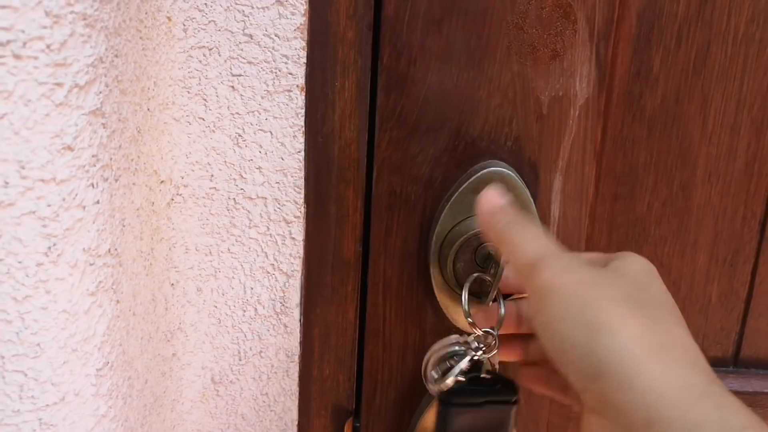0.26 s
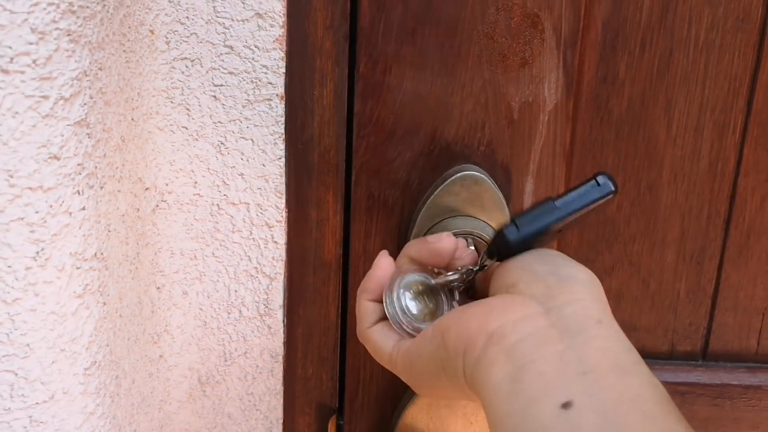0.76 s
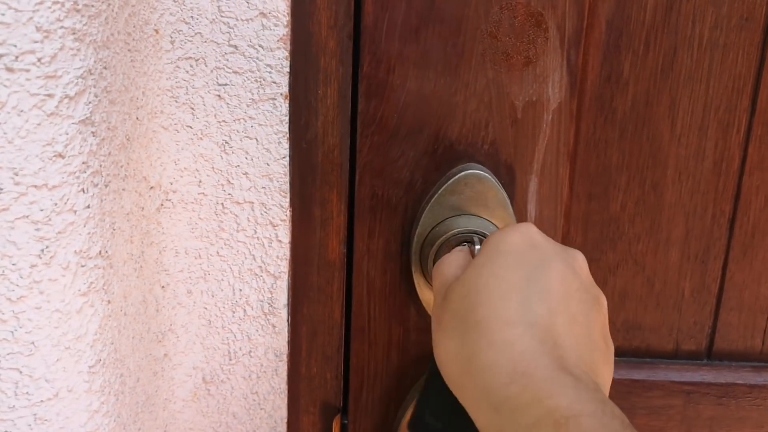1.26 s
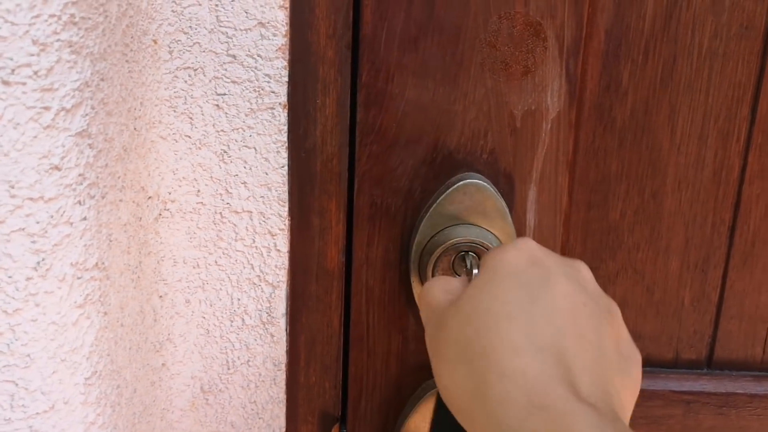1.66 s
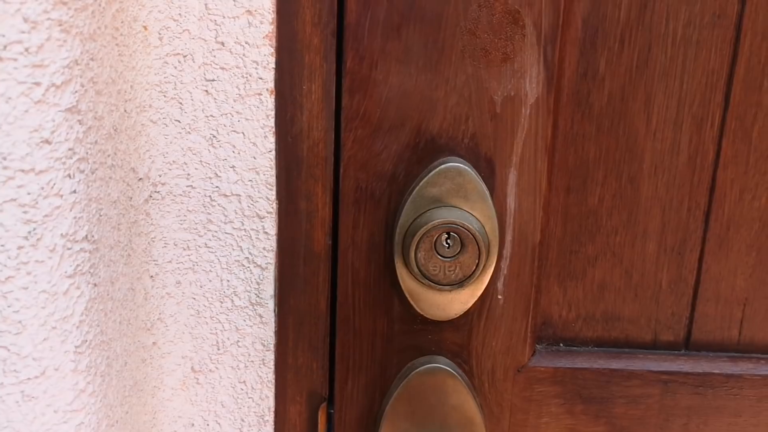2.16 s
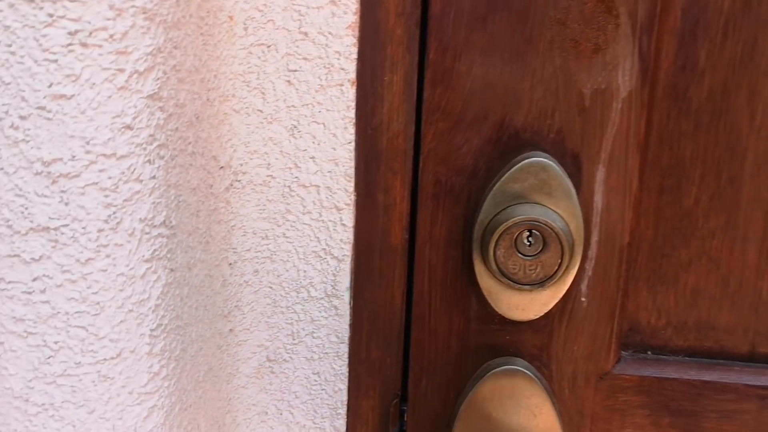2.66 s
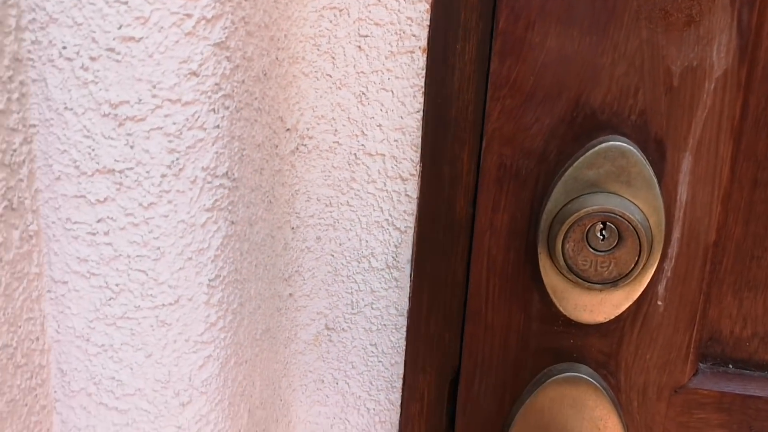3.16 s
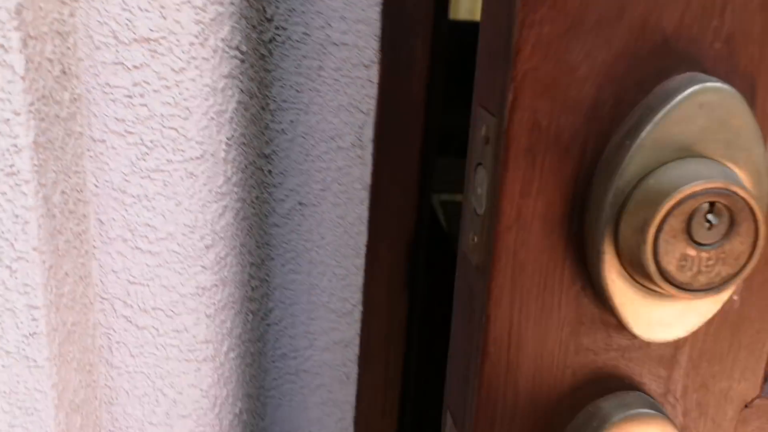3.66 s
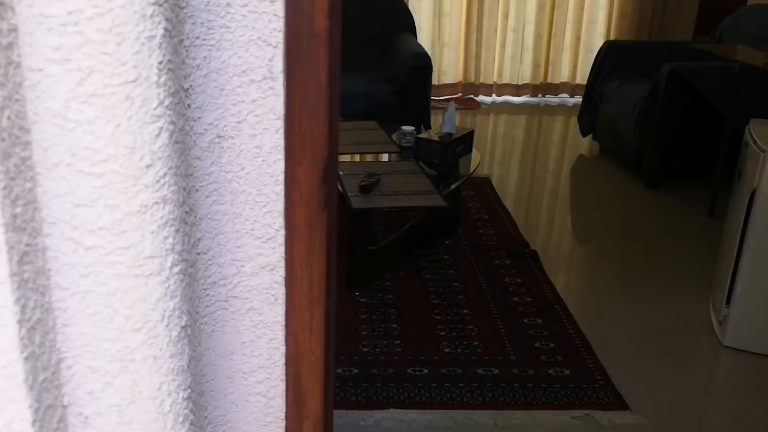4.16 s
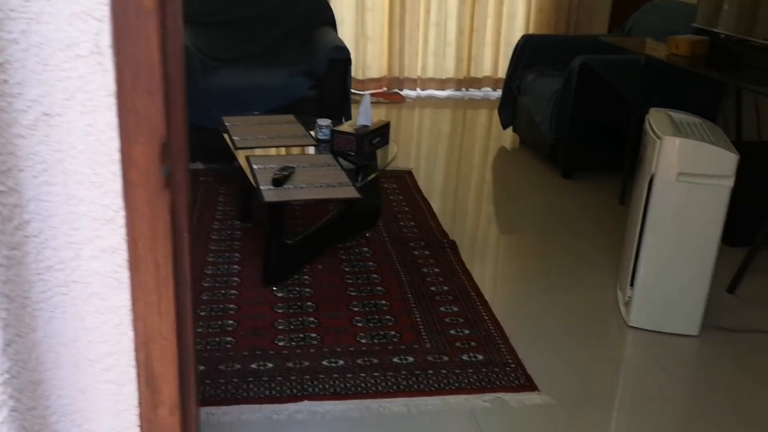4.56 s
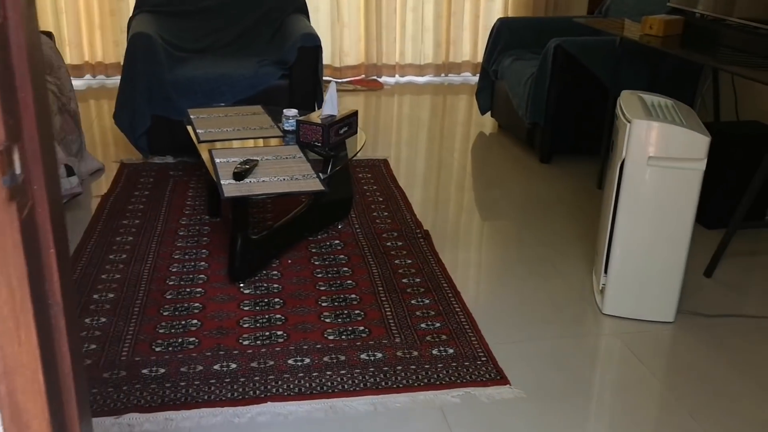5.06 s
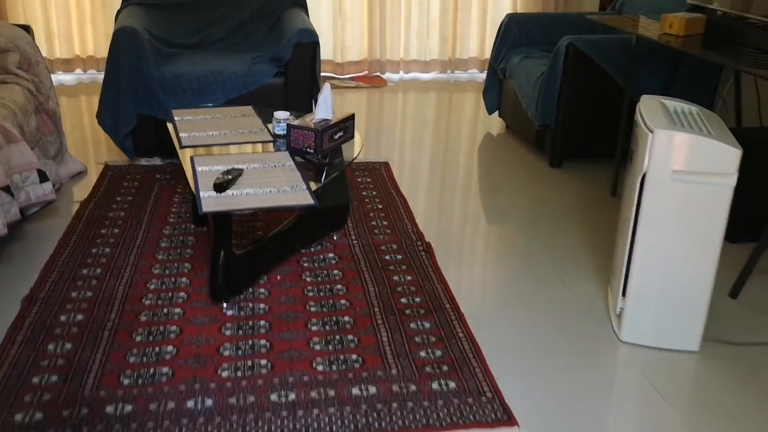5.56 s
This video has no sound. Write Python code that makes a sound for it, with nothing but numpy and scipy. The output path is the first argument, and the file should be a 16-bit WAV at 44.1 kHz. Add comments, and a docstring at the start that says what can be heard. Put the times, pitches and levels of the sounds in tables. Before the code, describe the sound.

Close, dry stereo sound of unlocking a door: clustered metallic ticks and rattling keys in the first second, a lull, then key withdrawal and light jingling. Near three seconds come the sharpest handle clacks with woody thumps, followed by a click as the door releases. A faint hinge rub and floor brush follow, under deep handling rumble and wind-like buffeting, fading to faint air with no voices.

```python
"""Outdoors at a door, a key enters the lock, turns and is pulled out; keys jangle, the handle clacks, the door swings in.
Each contact is a decaying burst of noise that excites damped modes of lock, plate, keys and wood.
Between contacts, ticks and noise make the scrape and rattle; the leaf knocks and the hinge rubs.
Shaped noise gives the hiss of air, the brush on the floor, and the rumble of hand and gusts.
The two ports of the hand-held microphone colour the sound differently."""
import sys
import numpy as np
from scipy import signal
from scipy.fft import rfft, irfft, next_fast_len
from scipy.io import wavfile
from scipy.ndimage import uniform_filter1d

SR = 44100
rng = np.random.default_rng(int(sys.argv[2]) if len(sys.argv) > 2 else 0)


def dump_mix(stems):
    """Bounce the given channels to the path in sys.argv[1] as a 16-bit WAV at rate SR."""
    frames = np.atleast_2d(stems).T  # one column per channel
    limited = np.clip(frames, -1, 1)  # hard clip at full scale
    pcm = np.round(limited * 32767).astype(np.int16)
    wavfile.write(sys.argv[1], SR, pcm)


N = 256926   # samples in the scene
SHAKE = 8192   # samples that one contact may last
LONGEST_RING = 60   # cycles, beyond a short allowance: hand and door damp every part
PORT_LAG = 30   # samples by which the right port hears the contacts later
CUTOFF_HZ = 16300

# Hand at rest: (time [s], level [dB])
HAND_AT_REST = [(0, -49), (1.5, -50), (2.5, -51.5), (3.85, -50.5), (4.08, -55.5), (4.38, -53.5), (5.2, -55),
                (5.83, -53.5)]
STILL_UPPER_DB = -10   # upper bass, re the hand at rest
# Hand jolts: (start [s], hold [s], level [dB], upper bass re level [dB])
HAND_JOLTS = [(0.117, 0.041, -46.5, -4), (0.284, 0.13, -36.5, -19), (0.419, 0.13, -30.5, -21.5),
              (0.556, 0.14, -44.5, -3), (0.806, 0.083, -39.5, -22.5), (0.973, 0.04, -42, -41),
              (1.046, 0.22, -41, -13.5), (1.336, 0.028, -39, -31), (1.631, 0.11, -36, -8.5),
              (1.734, 0.083, -30.5, -23), (1.848, 0.1, -39, -30), (2.04, 0.068, -40, -31),
              (2.217, 0.27, -48.5, -54), (2.614, 0.19, -46.5, -5.5), (2.866, 0.17, -39, -4.5),
              (3.092, 0.039, -39.5, -14), (3.28, 0.041, -45, -28), (3.7, 0.065, -59, -33),
              (3.416, 0.18, -62, 1.5), (3.895, 0.069, -47.5, -6.5), (3.997, 0.023, -74, -16),
              (4.413, 0.072, -39.5, -33), (4.474, 0.225, -31.5, -27), (4.714, 0.1, -29.5, -32),
              (4.941, 0.21, -33, -31), (5.245, 0.045, -42.5, -31), (5.343, 0.035, -39, -40),
              (5.548, .08, -46, -35), (5.723, 0.12, -56, -23)]
JOLT_ATTACK_S, JOLT_T60_S = 0.026, 0.22
# Gusts at the ports: (start [s], hold [s], level [dB])
PORT_GUSTS = [(.28, 0.094, -48.5), (1.65, 0.11, -51.5), (2.9, 0.03, -56), (3.11, .04, -47),
              (4.45, 0.17, -34.5), (4.62, 0.2, -40.5), (4.77, 0.08, -34.5), (4.96, 0.11, -40)]
GUST_ATTACK_S, GUST_T60_S = 0.065, 0.27
CALM_DB = -16.5   # draught between gusts, re the hand at rest
# Spectrum of the deep hand rumble: (frequency [Hz], relative density [dB per Hz])
DEEP_SPECTRUM = [(8.8, -25), (15, 10), (32, -2), (46, 7.5), (120, -25.5), (160, -40), (260, -120)]
# Spectrum of the upper bass of the hand: (frequency [Hz], relative density [dB per Hz])
UPPER_SPECTRUM = [(47, -52.5), (80, 7), (113, 0), (188, -1.5), (221, -11), (340, -19.5), (400, -20.5),
                  (520, -25), (880, -120)]
# Spectrum of the gusts: (frequency [Hz], relative density [dB per Hz])
GUST_SPECTRUM = [(15, -31), (40, -4.5), (75, -0.5), (120, -8.5), (180, -19.5), (280, -63), (450, -75)]

# Outdoor air: (time [s], level below the treble [dB], treble gain [dB])
AIR_LEVELS = [(0, -67.5, 9), (.4, -62.5, -3), (1.45, -72, 2), (2.3, -72, 4), (3.2, -55, 9.5),
              (3.7, -60, 11), (3.97, -59, 10), (4.1, -63, 5.5), (4.4, -64, 7), (4.95, -64.5, 8),
              (5.08, -60.5, 5), (5.5, -66.5, 7.5), (5.83, -60, 9)]
# Spectrum of air and floor brush ahead of the treble gain: (frequency [Hz], relative density [dB per Hz])
AIR_SPECTRUM = [(150, -15), (260, 2), (400, -13), (700, -7), (1300, -3.5), (2050, 4), (2700, -1.5),
                (3600, -12.5), (4700, -14.5), (5500, -11), (6500, -16), (8000, -10.5), (9800, -16),
                (12000, -27), (15000, -29.5), (16200, -69)]
# The door edge brushes the floor
BRUSH_S, BRUSH_HOLD_S, BRUSH_DB, BRUSH_ATTACK_S, BRUSH_T60_S = 4.404, 0.42, -54.5, 0.15, 0.37

# Hinge rubbing faintly as the door swings: (start [s], hold [s], level [dB])
HINGE_RUBS = [(3.9, 0.058, -61), (4.01, 0.047, -56.5), (4.14, 0.047, -57.5)]
HINGE_HZ, HINGE_T60_S = 5500, 0.006
HINGE_ATTACK_S, HINGE_FADE_S = 0.052, 0.12

# Scraping and rattling of the working hand:
# (start [s], hold [s], level below the treble [dB], treble gain [dB], left re right [dB])
RATTLE_STROKES = [(0.128, 0.053, -42.5, -14, -7), (0.298, 0.089, -54, -1.5, -1),
                  (0.387, 0.089, -52.5, 6, 2), (0.49, 0.14, -48, 1, -1.5), (0.641, 0.077, -51, 0.5, -4),
                  (0.725, 0.023, -57, -4, -4), (0.809, 0.1, -53, -7.5, -2), (0.936, .03, -58.5, -14, 4),
                  (1.062, 0.11, -44.5, 1, 0), (1.582, 0.15, -63, 1.5, 0), (1.647, 0.049, -48, 2.5, 1),
                  (1.716, 0.088, -52.5, -0.5, -2), (1.872, 0.12, -66.5, 6.5, -7),
                  (1.988, .12, -59.5, 13.5, -1), (2.286, 0.091, -62, -7, 2), (2.373, 0.09, -63, 3.5, 1),
                  (2.628, 0.26, -53, 3.5, -0.5), (2.877, 0.29, -50, 3.5, -0.5), (3.387, 0.081, -47, -18, 3),
                  (3.482, 0.072, -42.5, -4.5, -1)]
RATTLE_ATTACK_S, RATTLE_T60_S = 0.022, 0.096
# Spectrum of the scrape ahead of the treble gain: (frequency [Hz], relative density [dB per Hz])
SCRAPE_SPECTRUM = [(180, -50), (300, -31), (412, 1), (494, -9), (900, -6), (1250, -5), (2000, 3),
                   (3080, -7.5), (6000, -9.5), (6850, -8), (7820, -4.5), (14500, -21), (16000, -27)]

# Dull knocks of the door leaf: (time [s], peak [dB], loudest ring [Hz], decay T60 of the force [s])
LEAF_KNOCKS = [(1.652, -55, 248, 0.28), (2.438, -46, 415, 0.076), (2.731, -40.5, 413, 0.12),
               (2.832, -40.5, 200, 0.1), (2.957, -41.5, 200, 0.094), (3.91, -42.5, 326, 0.057),
               (3.941, -46.5, 371, 0.073), (3.991, -51, 202, 0.05), (4.133, -56.5, 400, 0.049),
               (4.857, -54, 320, 0.093)]
# Metal contacts: (time [s], lock peak [dB], loudest ring [Hz], plate re lock [dB], wood re lock [dB],
# decay T60 of the force [s], extra force of the crack [ratio], left re right [dB])
LOCK_HITS = [(0.1458, -38, 2816, -2.5, -12.5, 0.13, 2.3, 4.5),
             (0.318, -43.5, 1730, -10, -32, 0.096, 5.8, 7), (0.4032, -39, 1770, -27, -10.5, 0.36, 5.1, -2),
             (0.4474, -49, 1980, -22, -2.5, 0.17, 3.0, 12), (0.5293, -44, 1980, -19, -16, 0.18, 3.0, 2),
             (0.544, -35.5, 2040, -10, -5.5, 0.27, 3.5, 3.5),
             (0.5736, -26, 2350, -7, -12, 0.082, 2.8, -1.5), (0.598, -42, 2070, -20, -11, 0.1, 3.0, 7),
             (0.617, -36.5, 2430, -13, -18, 0.1, 3.5, 8), (0.6624, -34, 2270, -12, -20, 0.12, 2.4, 6),
             (0.6886, -38.5, 2620, -20, -15, 0.1, 4.7, 2), (0.7283, -42.5, 1790, -13, -14, 0.075, 4, 8),
             (0.752, -40, 1980, -15, -22, 0.04, 3.0, 4), (0.7887, -52, 2250, -13, -21, 0.17, 3.4, 10),
             (0.823, -46, 2060, -27, -27, 0.2, 3.0, 6), (0.8607, -37.5, 2150, -24, -17, 0.14, 3.8, 10),
             (0.9348, -39.5, 2100, -17, -17, 0.051, 4.6, 12), (1.024, -52, 2150, -6, -44, 0.15, 3.7, -2),
             (1.04, -29.5, 2000, -18, -47, 0.18, 2.5, 4.5), (1.0585, -32, 1950, -11, -46, 0.055, 3.2, -6),
             (1.0807, -26, 2040, -15, -38, 0.065, 3.5, 5.5), (1.091, -30, 1990, -8, -14, 0.04, 3.0, 0),
             (1.108, -27, 2046, -12.5, -17, 0.22, 3.0, 0.5), (1.1303, -31, 2030, -18, -20, 0.14, 2.3, 1.5),
             (1.1564, -34, 1724, -9.5, -16, 0.063, 1.2, 7), (1.2178, -46.5, 2270, -21, -14, 0.084, 4.7, 5),
             (1.2437, -50, 1850, -16, -25, 0.084, 3.0, 5), (1.3036, -50.5, 1930, -14, -4, 0.12, 3.7, 2),
             (1.377, -62, 1800, -32, 5, 0.11, 1.1, 2), (1.5, -52.5, 2050, -23, -7.5, 0.13, 3.9, 3),
             (1.6528, -41.5, 2160, -17, 0.5, 0.34, 3.3, 4.5), (1.7653, -44, 1940, -17, -38, 0.14, 2.3, 4),
             (1.7845, -34.5, 1934, -16.5, -8, 0.2, 3.0, 2.5), (1.8931, -38, 1900, -8.5, -43, 0.32, 3.5, 4),
             (1.9655, -44.5, 2030, -6, -48, 0.16, 1.8, 8.5), (2.022, -37, 1960, -6.5, -49, 0.32, 2.1, 4),
             (2.0507, -40, 1845, -11, -46, 0.1, 2.6, 17), (2.0899, -37.5, 1883, -10, -42, 0.11, 2.5, 7),
             (2.288, -57, 2210, -20, 0, 0.29, 2.2, 5.5), (2.368, -33.5, 2340, -7, -38, 0.16, 1.1, 4),
             (2.6224, -47, 2440, -7.5, -18, 0.15, 3.0, 11), (2.689, -45, 2030, -7, -17, 0.35, 2.5, 5),
             (2.7303, -27, 1917, -11, -8, 0.15, 4, 4), (2.7573, -32.5, 2100, -13, -12, 0.2, 2.3, 0),
             (2.8275, -28, 2180, -14, -6.5, 0.17, 2.6, 2.5),
             (2.8995, -28.5, 1920, -10.5, -14, 0.21, 3.4, 3), (2.9345, -30, 1825, -7, -14, 0.19, 5.3, -1.5),
             (2.9563, -25, 2680, 3.5, -11.5, 0.091, 2.8, -3.5),
             (2.9604, -28.5, 2083, -3, -16, 0.16, 2.4, 9), (3.0205, -27, 1915, -4.5, -11.5, 0.12, 1.4, 3),
             (3.0949, -25, 2184, -4.5, -15, 0.12, 3.4, 4),
             (3.4051, -32.5, 1980, -1.5, -6.5, 0.17, 1.9, 2.5),
             (3.5147, -28, 1964, -19, -15, 0.13, 7, 10.5), (3.6443, -46, 2640, -7.5, -9, 0.12, 2.6, -1),
             (4.135, -52.5, 1880, -4, -11.5, 0.25, 3.8, 3)]
HIT_KEYS_DB = -14.5   # the keys' answer, re lock
# Keys ticking on each other: (time [s], peak ahead of the high-pass [dB], brightest ring [Hz],
# its relative level, at most 20 [dB], left re right [dB])
KEY_TICKS = [(0.316, -47, 7170, 20, -7), (0.354, -38.5, 7600, 7, 4), (0.4035, -36, 7500, 5, 8),
             (0.412, -27.5, 7800, 13, -6), (0.419, -33, 9550, 4, 6), (0.4497, -33, 7800, 4, -6),
             (0.4545, -28, 7640, 9, 6), (0.471, -45, 5500, 2, 3), (0.5314, -34, 7350, -2, -1),
             (0.5714, -27.5, 8250, -14, 0), (0.597, -24, 7760, 4, 4), (0.6586, -29, 7800, 16, 5.5),
             (0.689, -31, 8560, 4, 5), (0.7253, -45, 7800, 5, -1), (0.76, -42.5, 7850, -8, -1),
             (0.789, -54, 7900, -1, 3), (0.807, -53, 8000, 11, 3.0), (0.8233, -37.5, 7900, 14, 3),
             (0.8555, -42, 7900, 2, 4), (0.8641, -29, 8000, 22, 1), (0.9351, -45.5, 5800, 16, 0),
             (0.945, -45.5, 7540, -9, -10), (1.0244, -47, 7300, 10, -0.5), (1.04, -24.5, 7600, 13, 6),
             (1.0935, -25.5, 7550, -4, 3), (1.117, -29.5, 7940, -7, 7.5), (1.132, -31, 7900, -2, 7),
             (1.502, -55, 8300, 12, 5), (1.665, -37, 7900, -18, -5), (1.714, -42, 7650, 7, 7),
             (1.7432, -35, 7600, 3, 1), (1.763, -42, 8000, 3, 4), (1.7888, -34, 6670, 0, -1),
             (1.8954, -41, 5000, 9, -7), (1.928, -44.5, 9700, 7, -2), (1.938, -49, 5000, 4, 3),
             (1.955, -48, 9600, -1, 11), (1.972, -38, 9340, 10, 1), (1.99, -29, 7900, 2, -1),
             (2.0005, -32, 7600, 8, 7), (2.016, -29.5, 7370, 1, 8), (2.025, -32, 7500, 4, 0),
             (2.04, -35, 7600, -1, 4), (2.0518, -27, 9600, 1, -1), (2.0905, -37, 9200, 8, 8),
             (2.111, -45, 7900, -2, 4), (2.366, -46, 5600, -1, 12), (2.5195, -59, 7900, -12, -1),
             (2.621, -41.5, 8800, 1, -4), (2.6905, -41, 8450, 9, -2), (2.7264, -31, 7500, -2, -5.5),
             (2.7703, -36, 7530, 4, 3), (2.7896, -45, 7700, 14, 13), (2.905, -31, 7700, 3, 6),
             (2.9531, -15.5, 5900, 4.5, 4.5), (3.0218, -26.5, 6300, 2, 3), (3.4062, -42.5, 5040, -16, 13.5),
             (3.5133, -56, 8700, 15, 2), (3.772, -47.5, 6700, 10, -8), (3.894, -48.5, 9000, 7, 0),
             (4.032, -35.5, 5630, 5, 6), (5.2684, -54, 6800, 0, 6)]

# Modes of the lock: (frequency [Hz], relative level [dB], T60 before the damping limits [s])
LOCK_MODES = [(1474, -10.5, 0.033), (1755, -4, 0.11), (1900, 1, 0.074), (2060, -1.5, 0.046),
              (2187, 5, 0.026), (2320, 0, 0.048), (2620, 3.5, 0.016), (2907, -11, 0.035),
              (3445, -14.5, 0.0052)]
# Modes of the cover plate: (frequency [Hz], relative level [dB], T60 before the damping limits [s])
PLATE_MODES = [(3030, 0.5, 0.0065), (3620, 2, 0.0067), (3910, -2, 0.0098), (4340, -0.2, 0.0092),
               (4466, 1.5, 0.0048), (5000, 1.5, 0.0065), (5310, 3, 0.0045), (5900, -1, 0.0047)]
# Modes of the keys: (frequency [Hz], relative level [dB], T60 before the damping limits [s])
KEY_MODES = [(6380, -8.5, 0.0045), (7370, -3.5, 0.0043), (7540, -10, 0.034), (8070, -0.5, 0.0044),
             (9000, -3.5, 0.0045), (9600, 0, 0.0046), (9960, -1.5, 0.0017), (10720, -9, 0.0048),
             (13000, -13.5, 0.0035), (14800, -14, .003), (14900, -36.5, .003)]
# Modes of the wood round the lock: (frequency [Hz], relative level [dB], T60 before the damping limits [s])
WOOD_MODES = [(420, -2.5, 0.045), (615, -8, 0.068), (763, 2, 0.023), (926, 13, 0.015), (1330, 14.5, 0.0055)]
# Modes of the door leaf: (frequency [Hz], relative level [dB], T60 before the damping limits [s])
LEAF_MODES = [(148, 15, 0.038), (197.4, 6, 0.16), (293, 3.5, 0.16), (352, -5, 0.054), (407, -9, .03)]

# Resonances of the two ports: (frequency [Hz], left re right [dB])
PORT_RESPONSE = [(300, -0.5), (1000, 0.5), (2200, 2.5), (4000, 0.5), (6000, 1), (8000, 5), (9700, -5),
                 (13000, -0.5)]


def from_db(db):
    """Logarithmic levels: converts decibels to an amplitude factor."""
    return 10 ** (np.asarray(db) / 20)


def rms_one(x):
    """Mean power: scales a signal to rms 1."""
    return x / np.sqrt(np.mean(x ** 2) + 1e-20)


def in_time(rows):
    """Linear interpolation: the columns of a curve table at every sample."""
    s, *columns = np.transpose(rows)
    return [np.interp(np.arange(N) / SR, s, column) for column in columns]


def swells(rows, attack_s, t60):
    """Exponential decay: each row's envelope rises from its start, holds, then dies away."""
    s, hold, db = np.array(rows)[:, :3].T[:, :, None]
    t = np.arange(N) / SR - s
    rise = np.clip(t / attack_s, 0, 1) ** 2
    return rise * from_db(db - 60 * np.maximum(t - hold, 0) / t60)


def colour(x, points):
    """Linear filtering: multiplies the spectrum by a curve in dB over log frequency."""
    hz, db = np.transpose(points)
    size = next_fast_len(N)
    bins = np.fft.rfftfreq(size, 1 / SR) + 1
    gain = from_db(np.interp(np.log(bins), np.log(hz), db))
    return irfft(rfft(x, size) * gain, size)[..., :N]


def split(x, treble_db, hz):
    """Band division: rms 1 below hz, with the part above hz raised or lowered."""
    low = signal.sosfilt(signal.butter(4, hz, "low", fs=SR, output="sos"), x)
    high = signal.sosfilt(signal.butter(4, hz, "high", fs=SR, output="sos"), x)
    return (low + from_db(treble_db) * high) / np.sqrt(np.mean(low ** 2))


def sides(pan_db):
    """Interaural-style level difference: shares it equally between left and right gains."""
    return from_db(np.array([pan_db / 2, -pan_db / 2]))


def rings(modes):
    """Damped free vibration: one exponentially decaying sine per mode."""
    hz, db, t60 = np.array(modes).T[:, :, None]
    t = np.arange(SHAKE) / SR
    damped_t60 = np.clip(t60, .002, 0.0065 + LONGEST_RING / hz)
    return from_db(db - 60 * t / damped_t60) * np.sin(2 * np.pi * hz * t)


def with_ring(modes, hz, db, t60):
    """Modal superposition: adds the ring of the part that is hit."""
    return np.vstack([modes, rings([(hz, db, t60)])])


def strike(modes, t60, crack, alike):
    """Forced vibration: a crack and chattering loose parts drive unevenly excited modes; peak level 1."""
    t = np.arange(SHAKE) / SR
    white = rng.standard_normal((3, SHAKE))
    lumps = np.repeat(from_db(rng.normal(0, 3, SHAKE // 64)), 64)
    # shared force plus a separate one for the path to each port
    force = (alike * white[0] + white[1:]) * lumps
    force *= from_db(-60 * t / max(t60, .005))
    force *= np.minimum(1, 0.66 + t / 0.0027)   # the chatter builds up
    force[:, :16] *= 1 + max(crack, 0)
    strengths = from_db(rng.normal(0, 3, (2, len(modes))))
    strengths *= (-1) ** np.arange(len(modes))
    response = strengths @ modes
    out = irfft(rfft(force, 2 * SHAKE) * rfft(response, 2 * SHAKE))[:, :SHAKE]
    out *= np.minimum(1, np.linspace(3, 0, SHAKE))   # the last third fades out
    power = uniform_filter1d(np.mean(out ** 2, axis=0), 132)   # over 3 ms
    return out / np.sqrt(power.max())


def add(out, part, s):
    """Superposition: mixes a short sound in at time s."""
    i = round(s * SR)
    out[:, i:i + SHAKE] += part[:, :N - i]


def rumble():
    """Common-mode and differential pressure: hand noise is alike at both ports, gusts are brighter and differ."""
    jolts = swells(HAND_JOLTS, JOLT_ATTACK_S, JOLT_T60_S)
    still = from_db(in_time(HAND_AT_REST)[0])
    gust_level = swells(PORT_GUSTS, GUST_ATTACK_S, GUST_T60_S).sum(axis=0) + still * from_db(CALM_DB)
    upper_level = still * from_db(STILL_UPPER_DB) + from_db(np.array(HAND_JOLTS)[:, 3]) @ jolts
    white = rng.standard_normal((6, N))
    deep = colour(white[0], DEEP_SPECTRUM)
    # the push is steady: even out the slow swings of the noise
    deep = deep / np.sqrt(uniform_filter1d(deep ** 2, 3500) + 0.53 * np.mean(deep ** 2))
    deep = deep * (still + jolts.sum(axis=0))
    upper = rms_one(colour(white[1:3], UPPER_SPECTRUM)) * upper_level
    gust = rms_one(colour(white[3:], GUST_SPECTRUM)) * gust_level
    mid = deep + upper[0] + gust[0]
    side = 0.26 * gust[1] + from_db(-24.0) * upper[1]
    return np.array([mid + side, mid - side])


def air_and_floor_brush(flutter_db=1.5):
    """Incoherent broadband noise: fluttering air, swelling as the door edge brushes the floor."""
    level_db, treble_db = in_time(AIR_LEVELS)
    slow = uniform_filter1d(uniform_filter1d(rng.standard_normal(N), 900), 900)
    flutter = from_db(flutter_db * rms_one(slow))
    noise = split(colour(rng.standard_normal((2, N)), AIR_SPECTRUM), treble_db, hz=3860)
    brush, = swells([(BRUSH_S, BRUSH_HOLD_S, BRUSH_DB)], BRUSH_ATTACK_S, BRUSH_T60_S)
    return (from_db(level_db) + brush) * flutter * noise


def hinge():
    """Friction excitation: noise drives one short metal ring."""
    ring = rings([(HINGE_HZ, 0, HINGE_T60_S)])
    friction = signal.fftconvolve(rng.standard_normal((2, N)), ring)[:, :N]
    return swells(HINGE_RUBS, HINGE_ATTACK_S, HINGE_FADE_S).sum(axis=0) * rms_one(friction)


def thuds():
    """Low-frequency modal response: the large, slow leaf gives both ports nearly the same pressure."""
    out, leaf, unlike = np.zeros((2, N)), rings(LEAF_MODES), .4
    for s, db, hz, t60 in LEAF_KNOCKS:
        mid, side = strike(with_ring(leaf, hz, db=8.0, t60=0.13), t60, crack=0.41, alike=0)
        add(out, from_db(db) * np.array([mid + unlike * side, mid - unlike * side]), s)
    return out


def rattle(per_s=400, smooth=0.59, blur_s=0.025, jingle_db=-8.0):
    """Random impulse excitation: each uneven tick is a noise burst on a smooth scrape and rings one metal mode."""
    sizes = from_db(4 * np.minimum(rng.exponential(1, N), 3))
    ticks = (rng.random(N) < per_s / SR) * sizes
    bursts = signal.lfilter([1], [1, -np.exp(-1 / (blur_s * SR))], ticks)
    scrape = (smooth + rms_one(bursts)) * rng.standard_normal((2, N))
    grains = rms_one(colour(scrape, SCRAPE_SPECTRUM))
    metal = rings(LOCK_MODES + KEY_MODES)
    dealt = rng.integers(0, len(metal), (2, N))   # which mode a tick rings, at each port
    jingle = np.zeros((2, N))
    for k, mode in enumerate(metal):
        jingle += signal.oaconvolve(ticks * (dealt == k), mode[None, :SHAKE // 4])[:, :N]
    grains = grains + from_db(jingle_db) * rms_one(jingle)
    strokes = swells(RATTLE_STROKES, RATTLE_ATTACK_S, RATTLE_T60_S)
    level = strokes.sum(axis=0)
    # treble and side averaged over the strokes, weighted by their levels
    treble_db, pan_db = np.array(RATTLE_STROKES)[:, 3:].T @ strokes / (level + 1e-12)
    return level * sides(pan_db) * split(grains, treble_db, hz=3540)


def key_ticks(plate, keys):
    """Radiation from small bodies: colliding keys ring brightly and sound weak at low frequencies."""
    out = np.zeros((2, N))
    small = signal.butter(2, 2500, "high", fs=SR, output="sos")   # keys are too small to sound low
    for s, db, hz, ring_db, pan_db in KEY_TICKS:
        bunch = np.vstack([from_db(-11.0) * plate, keys])
        bunch = with_ring(bunch, hz, np.minimum(ring_db, 20), t60=0.0074)
        part = signal.sosfilt(small, strike(bunch, 0.07, crack=7.1, alike=0.8))
        add(out, from_db(db) * sides(pan_db)[:, None] * part, s)
    return out


def lock_hits(plate, keys):
    """Coupled structures: lock, cover plate, keys and surrounding wood all answer each contact."""
    out, lock, wood = np.zeros((2, N)), rings(LOCK_MODES), rings(WOOD_MODES)
    for s, db, hz, plate_db, wood_db, t60, crack, pan_db in LOCK_HITS:
        part = strike(with_ring(lock, hz, db=9.0, t60=0.051), t60, crack, alike=1.0)
        part += from_db(plate_db) * strike(plate, t60, crack, alike=0.4)
        part += from_db(HIT_KEYS_DB) * strike(keys, t60, crack, alike=0.5)
        part += from_db(wood_db) * strike(wood, t60, crack=0.52, alike=1.4)
        add(out, from_db(db) * sides(pan_db)[:, None] * part, s)
    return out


def contacts():
    """Arrival-time difference: the right port hears lock and keys a little later."""
    plate, keys = rings(PLATE_MODES), rings(KEY_MODES)
    out = key_ticks(plate, keys) + lock_hits(plate, keys)
    out[1] = np.roll(out[1], PORT_LAG)
    return out


def scene():
    """Superposition: the pressures of all sources add at the two ports."""
    return rumble() + air_and_floor_brush() + hinge() + thuds() + rattle() + contacts()


def record(dry):
    """Frequency response: each port has its own resonances, and a low-pass cuts the top."""
    left = colour(dry[0], [(hz, db / 2) for hz, db in PORT_RESPONSE])
    right = colour(dry[1], [(hz, -db / 2) for hz, db in PORT_RESPONSE])
    low_pass = signal.cheby2(12, 70, CUTOFF_HZ, fs=SR, output="sos")
    return signal.sosfilt(low_pass, np.array([left, right]))


dry = scene()
out = record(dry)
dump_mix(out)
```